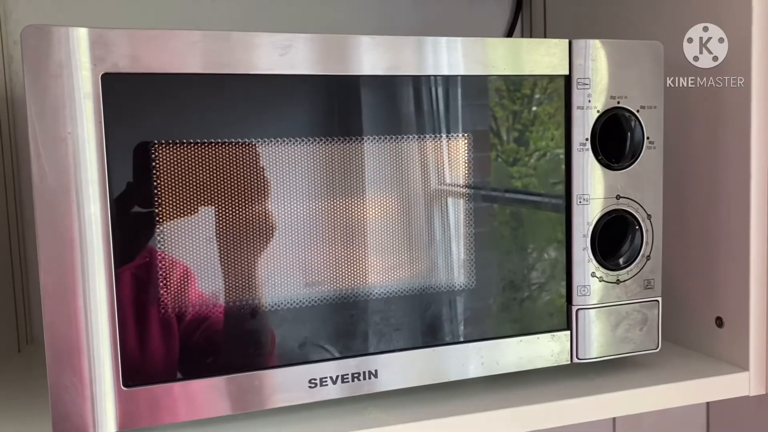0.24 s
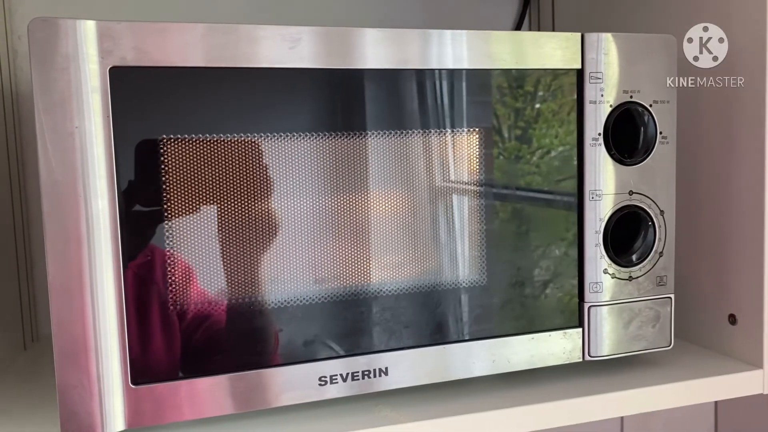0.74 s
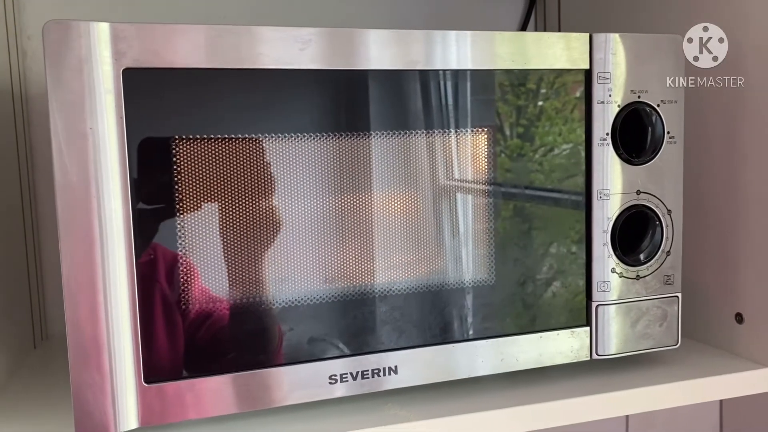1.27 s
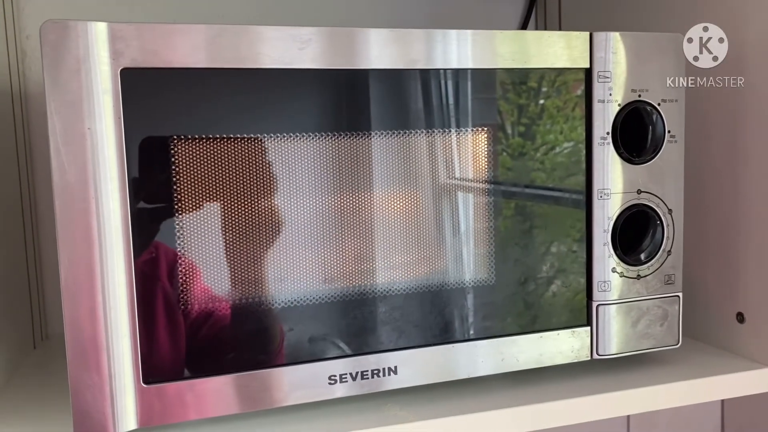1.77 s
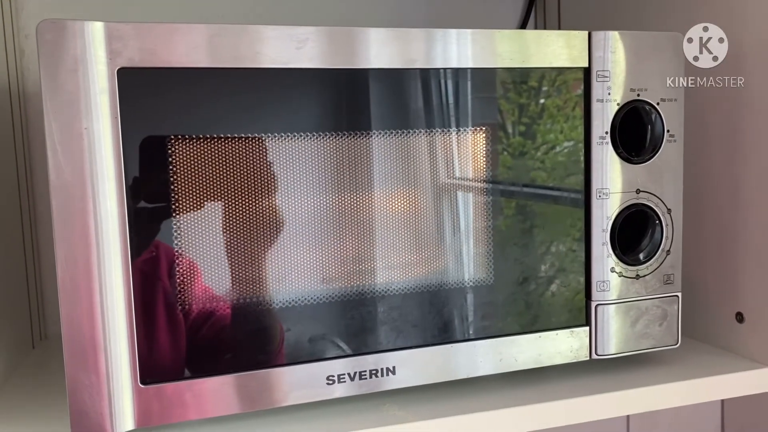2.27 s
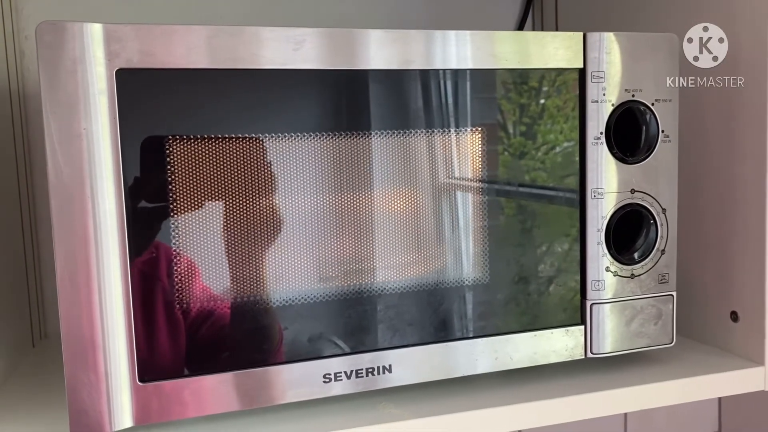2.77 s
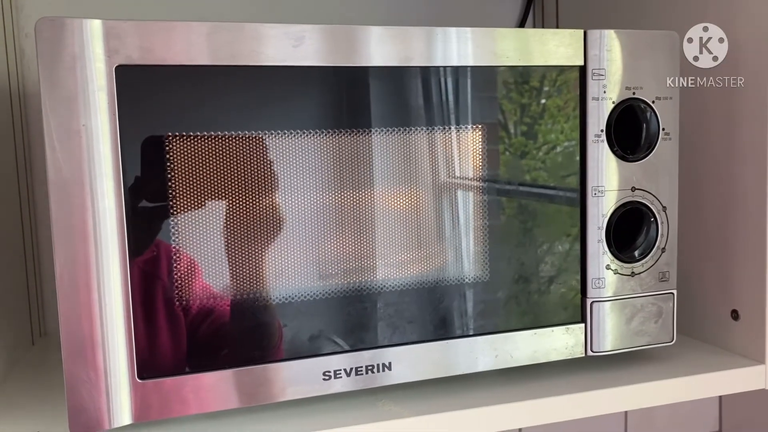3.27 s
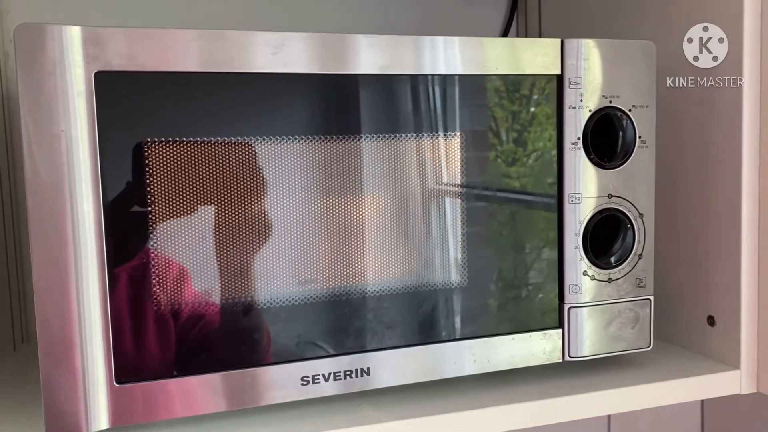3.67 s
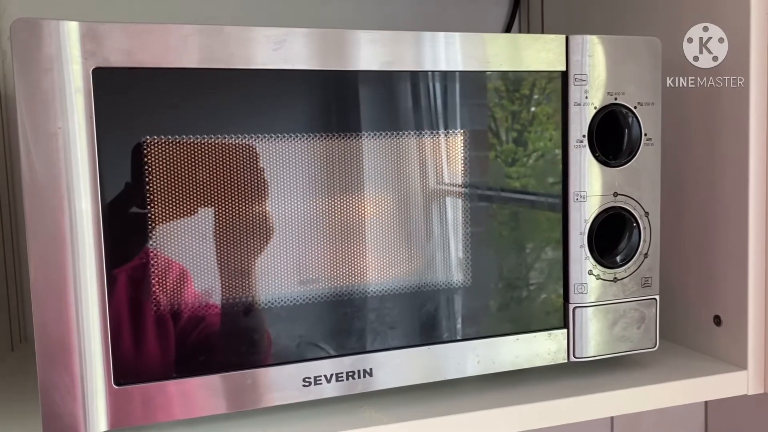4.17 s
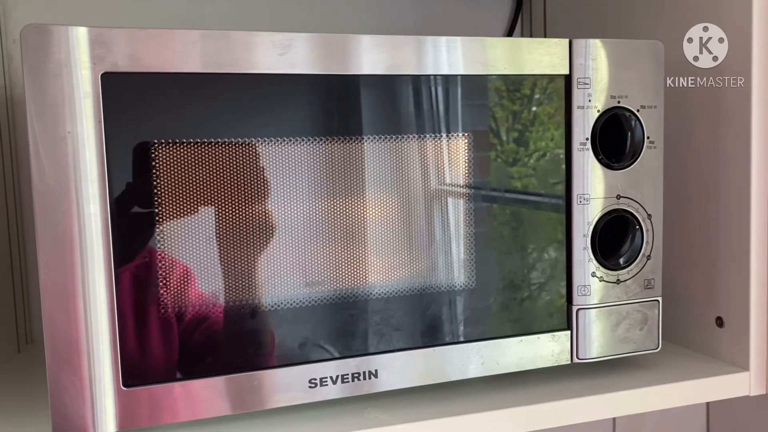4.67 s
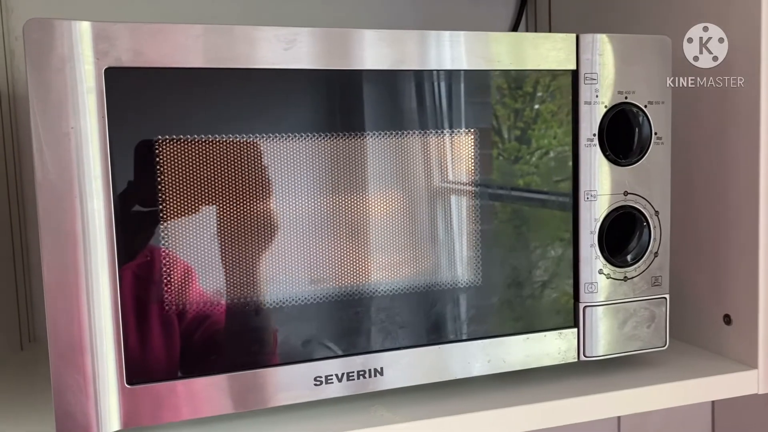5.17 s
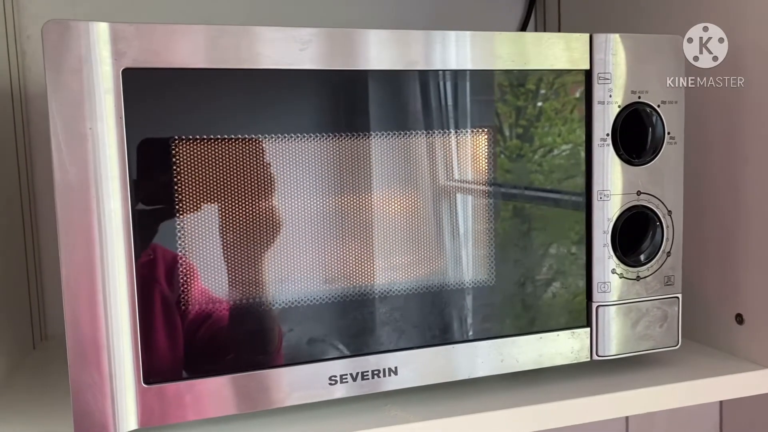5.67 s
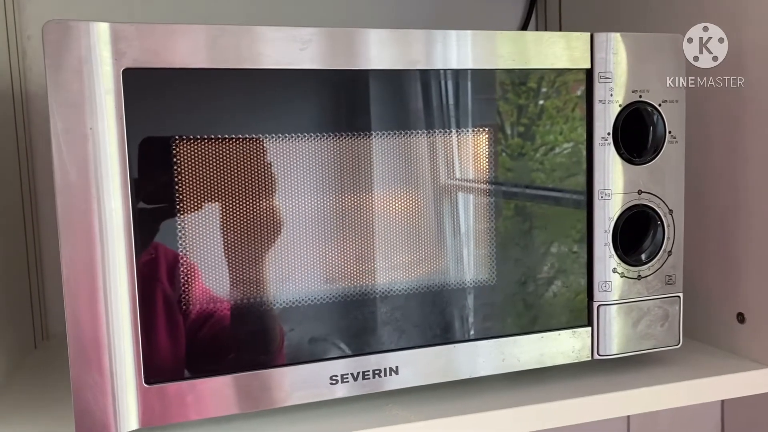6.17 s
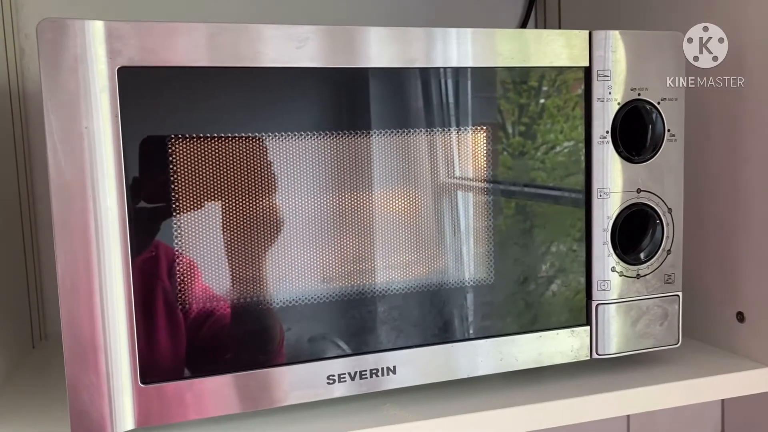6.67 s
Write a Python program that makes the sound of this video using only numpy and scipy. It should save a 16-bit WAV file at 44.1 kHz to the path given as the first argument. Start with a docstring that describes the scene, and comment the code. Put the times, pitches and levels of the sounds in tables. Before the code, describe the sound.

Continuous whirring of a countertop microwave, close microphone, indoors. The deep hum of its fan blades and a gentle electrical buzz blend with muffled, mid-low blowing air coloured by the metal case. Near three and a half seconds the sound drops out for less than a tenth of a second and returns smoothly, with a soft low thud-like rumble, then continues unchanged to the end, with barely audible small ticks.

```python
"""A microwave oven on a kitchen shelf, close to a two-port microphone, enters partway through a loop of a few seconds.
Fan sines on multiples of the shaft speed, noise coloured by the resonant case and sines of mains buzz run along.
After some three seconds the loop fades out, pauses for a moment and fades in again. Low rumble (mains hum and noise)
swells now and then; short shaky sines blip in the whirr, a noise burst ticks and a short sine peeps."""
import sys
import numpy as np
from scipy import signal
from scipy.io import wavfile
from scipy.ndimage import uniform_filter1d

SR = 44100
rng = np.random.default_rng(int(sys.argv[2]) if len(sys.argv) > 2 else 0)


def digitize_waveform(pressure):
    """Quantize a signal to 16-bit integers and store it at the path in sys.argv[1].

    Rows of a 2-D input are taken as channels; values are limited to [-1, 1].
    """
    field = np.atleast_2d(pressure).T
    bounded = np.clip(field, -1, 1)
    quanta = np.round(bounded * 32767).astype(np.int16)
    wavfile.write(sys.argv[1], SR, quanta)


N = 305172

SHAFT_HZ, BUZZ_HZ = 41.86, 100.05  # fan shaft speed; buzz at twice the mains rate
LOOP_S, RESTART_S = 4.57433, 3.404  # loop length; time heard when it begins again
SILENT_S, CUT_S = .0705, .0015  # pause at the end of the loop; quick soft step on either side of it
FADE_IN_S, FADE_OUT_S = 0.14, .105  # straight ramps of amplitude
FADE_IN_DB, FADE_OUT_DB = -27, -15.5  # gain where each ramp meets the pause
EDGE_HZ = 15800  # upper band limit
SIDE = np.array([[.5], [-.5]])  # left port, right port: shares out a left-right difference


def gain_of(db):
    """Amplitude factor of a level in dB."""
    return 10 ** (np.asarray(db) / 20)


def evened(x):
    """The same signal brought to rms 1."""
    return x / np.sqrt(np.mean(x ** 2) + 1e-20)


def read(points, hz):
    """Reads a curve between its points, along a logarithmic frequency axis."""
    f, value = np.transpose(points)
    return np.interp(np.log(hz + 1), np.log(f + 1), value)


def wander(t, top_hz):
    """Slow chance of rms 1: sines of random phase, the slower ones stronger."""
    total = 0
    for f in np.geomspace(top_hz / 20, top_hz, num=20):
        total = total + np.sin(2 * np.pi * (f * t + rng.random())) / np.sqrt(f)
    return evened(total)


def tone(turns, db, pan_db, lead=0, waver_db=1.0, waver_hz=12):
    """One sine of wavering level at both ports, with a trough at whole turns when neither port leads."""
    coarse_t = np.arange(0, N, 64) / SR
    level_db = np.interp(np.arange(N) / SR, coarse_t, db + waver_db * wander(coarse_t, waver_hz))
    level = gain_of(level_db + SIDE * pan_db)
    return -np.sqrt(2) * level * np.cos(2 * np.pi * turns + SIDE * lead)


def add(mix, s, sound):
    """Places a sound heard at time s at its spot in the loop."""
    start = round((s - RESTART_S) % LOOP_S * SR)
    mix[:, start:][:, :sound.shape[1]] += sound


def tick(out):
    """A faint burst of bright noise, alike at both ports, that dies fast at first, with a weaker, slower tail."""
    rise_s, t60_s, tail_t60_s, tail_db = .003, 0.04, .18, -8
    ring_hz, ring_width_hz = 11000, 2600
    t = np.arange(4000) / SR
    ring_band = [ring_hz - ring_width_hz / 2, ring_hz + ring_width_hz / 2]
    ring = signal.butter(2, ring_band, "bandpass", fs=SR, output="sos")
    broad = signal.butter(2, [5500, 14000], "bandpass", fs=SR, output="sos")
    noise = rng.standard_normal(len(t)) * np.ones((2, 1))
    burst = evened(signal.sosfilt(ring, noise))
    burst = burst + gain_of(-1) * evened(signal.sosfilt(broad, noise))
    dying = gain_of(-60 * t / t60_s) + gain_of(tail_db - 60 * t / tail_t60_s)
    add(out, 4.7475, burst * np.minimum(t / rise_s, 1) * gain_of(-66.5) * dying)


def peep_and_blips(out):
    """Short sines under a half-sine arch of level: a faint high peep, and blips of shaky phase in the whirr."""
    # brief tonal blips, once a loop: (time heard [s], level [dB rms], frequency [Hz])
    blips = [(3.586, -59, 1750), (5.337, -58, 1447), (5.984, -55, 1380), (6.538, -54.5, 1363),
             (6.7, -56.5, 1765), (6.78, -56, 1430)]
    arch_s, blip_pan_db, shake_turns = 0.037, 10, .4
    t = np.arange(4000) / SR
    arch = 2 * np.sin(np.pi * np.clip(t / arch_s, 0, 1)) * np.ones((2, 1))
    add(out, 6.122, gain_of(-73) * arch * np.sin(2 * np.pi * 7740 * t))  # the peep
    slow = signal.butter(2, 60, fs=SR, output="sos")
    for s, db, hz in blips:
        shake = shake_turns * evened(signal.sosfilt(slow, rng.standard_normal(len(t))))
        sides = gain_of(db + SIDE * blip_pan_db)
        add(out, s, sides * arch * np.sin(2 * np.pi * (hz * t + shake)))


def small_sounds():
    """The faint short sounds, laid into the loop."""
    out = np.zeros((2, N))
    tick(out)
    peep_and_blips(out)
    return out


def rumble():
    """Hum and noise near the mains rate, alike at both ports, that swells quickly and sinks slowly."""
    # swells of the rumble, once a loop: (start as heard [s], top level of the noise part [dB rms])
    swells = [(3.47, -55.5), (3.72, -63), (3.92, -61), (4.25, -67), (5, -65.5), (2.68, -69)]
    floor_db, rise_s, fall_db_per_s = -78, 0.052, 40
    hum_db = 5  # pure mains hum against the noise
    t = np.arange(N) / SR
    level = gain_of(floor_db)
    for s, db in swells:
        since = t - (s - RESTART_S) % LOOP_S
        sinking = gain_of(db - fall_db_per_s * (since - rise_s))
        level = level + np.clip(since / rise_s, 0, 1) * sinking
    band = signal.butter(4, [42, 68], "bandpass", fs=SR, output="sos")
    noise = evened(signal.sosfilt(band, rng.standard_normal(N)))
    hum = tone(BUZZ_HZ / 2 * t, hum_db, 0, waver_db=2.0, waver_hz=6.5)
    return (noise + hum) * level


def transformer():
    """Steady mains tones, one mixed with the blade rate, that swell unevenly together."""
    # mains buzz, and the tone at buzz rate plus blade rate, before the swell:
    # (multiple of the buzz [1], multiple of the shaft [1], level [dB rms], left-right [dB])
    buzz = [(1, 0, -56, -2), (2, 0, -65, 6.5), (1, 4, -56.5, -2.5), (3, 0, -61, 2), (4, 0, -65.5, 8),
            (6, 0, -63, 2)]
    # swell of the whole buzz: (time into the loop [s], level [dB])
    buzz_swell = [(0, 0), (.6, 1.5), (1.2, -1.5), (1.6, 0), (2.1, 2), (2.6, -1), (3.1, -4.5), (3.5, 2),
                  (4, -1.5), (4.5, -1)]
    t = np.arange(N) / SR
    total = 0
    for m, k, db, pan in buzz:
        hz = round(m) * BUZZ_HZ + round(k) * SHAFT_HZ
        total = total + tone(hz * t + rng.random(), db, pan, waver_db=1.5, waver_hz=5)
    return gain_of(np.interp(t, *np.transpose(buzz_swell))) * total


def airflow():
    """Turbulent air blown by the fan: noise coloured by the resonant case, in drifting patches."""
    # spectrum of the air before the case, only its shape counts: (frequency [Hz], level [dB per Hz])
    air_colour = [(22, -30), (33, -24), (45, -20), (62, -12), (80, -9), (150, -7.5), (300, -6.5), (500, -5),
                  (800, -8.5), (1300, -12), (1900, -19.5), (3000, -24), (4500, -31), (6800, -38.5),
                  (8600, -45), (11500, -51), (15000, -64), (15800, -80)]
    # case and shelf resonances that lift or notch the air noise:
    # (frequency [Hz], width [Hz], lift [dB], left-right [dB])
    resonances = [(75, 14, 1.5, 1), (87, 8, -5.5, -1), (99, 6.4, 5.5, 1), (129.4, 34, 5.5, 1.5),
                  (183, 21, -5.5, 1), (211.8, 14.7, 8, -1), (228.3, 20, 9, 3), (247, 16, -7, -2),
                  (281, 16, -4, 7), (322.4, 15, -7, 3), (340.2, 22, 8, 2), (367, 26, -9.5, 1),
                  (435, 20, 5, 3), (455, 17, -7, 7), (468, 12, -6.5, 0), (514, 11, -2.5, 1),
                  (525, 31, 4.5, -1.5), (541, 10, -3.5, 0), (559, 29, 4.5, 2.5), (609, 55, 5.5, 5.5),
                  (707, 35, -2, -1), (752, 16, 3, 1), (794, 27, -3, -3), (795, 14, -1, -1),
                  (823, 27, -8, 9), (864.8, 61, 10.5, 1), (917, 35, 2.5, 4), (966, 12, -2, 1),
                  (1015, 26, 8, -4.5), (1047, 14, -5.5, 1), (1053, 38, -5.5, 7), (1152, 87, 3, -2),
                  (1198, 20, 4.5, 1), (1219, 25, -10, -3), (1310, 19, -3.5, 2), (1337, 25, 1, 4),
                  (1394, 18, 4, -7), (1380, 14, -3, 0), (1560, 18, -5.5, -1), (1612, 57, 5, 2),
                  (1692.5, 27, 9.5, 5), (1744, 28, 6, 3), (1800, 25, -5.5, -6), (1823, 30, 3, 12.5),
                  (1870, 25, -0.5, -1), (2030, 55, 3, 6.5), (2140, 17, 1, 0), (2230, 57, 5, 5.5),
                  (2300, 35, -3.5, 1), (2378, 78, 6.5, 3.5), (2436, 33, 3, -2), (2470, 35, -1.5, -1),
                  (2510, 80, 2, 6.5), (2644, 47, 3.5, 3), (3030, 60, 2.5, 3), (3160, 50, -3, 0),
                  (3240, 45, 4.5, 2), (3340, 50, -11.5, 1), (3440, 45, 4.5, -1), (3570, 50, -4, 0),
                  (3630, 79, 3, 2), (3830, 220, 1, 1), (6660, 310, 3, -3)]
    # likeness of the two ports: (frequency [Hz], left-right correlation [1])
    likeness = [(25, .9), (45, .97), (60, 0.97), (120, 1), (400, 0.95), (640, 0.83), (760, 0.5),
                (900, 0.79), (1100, 0.56), (1350, 0.33), (1700, 0.4), (1950, 0.17), (2400, 0.57),
                (3700, 0.71), (5300, 0.29), (6600, 0.85), (9000, 1), (14500, 0.97)]
    # balance of the ports: (frequency [Hz], left-right [dB])
    balance = [(60, 1), (180, 1), (540, -1.5), (1620, -1.5), (4850, 2.5), (14500, -1.5)]
    # phase between the ports: (frequency [Hz], lead of the left [rad])
    left_lead = [(60, 0), (850, -.1), (1030, -1.4), (1300, 0), (3100, .4), (4200, -.1), (5300, .8),
                 (7300, 0), (9000, -3.1), (11000, -6.3), (13200, -9.4), (14700, -12.6)]
    air_db, patch_db = -41, 0.98  # level of the whole; rms depth of the patches
    frames, hz = N // 1024 + 5, np.fft.rfftfreq(4096, 1 / SR)
    a, b, c, d, patches = rng.standard_normal((frames, 2049, 5)).T
    patches = uniform_filter1d(patches, size=30, axis=0)  # along frequency
    patches = evened(uniform_filter1d(patches, size=3, axis=1))  # along time

    same = np.clip(read(likeness, hz), -1, 1)[:, None]
    left = a + 1j * b
    right = same * left + np.sqrt(1 - same ** 2) * (c + 1j * d)

    case_db = 0
    for f, width, db, pan in resonances:
        case_db = case_db + (db + SIDE * pan) / (1 + (2 * (hz - f) / width) ** 2)
    colour = gain_of(read(air_colour, hz) + SIDE * read(balance, hz) + case_db)
    colour = colour * np.exp(1j * SIDE * read(left_lead, hz))

    # reflections from shelf and walls leave a fixed fine ripple, partly different at each port
    ripple = uniform_filter1d(rng.standard_normal((3, 2049)), size=2)
    depth_db = 1.8 * np.clip((hz - 900) / 3000, 0, 1)
    colour *= gain_of(depth_db * evened(ripple[0] + ripple[1:]))

    spectrum = np.array([left, right]) * colour[..., None] * gain_of(patch_db * patches)
    air = signal.istft(spectrum, nperseg=4096, noverlap=3072)[1][:, :N]
    return gain_of(air_db) * evened(air)


def fan():
    """Multiples of a slightly drifting shaft speed, troughs lined up as in suction pulses; higher ones waver more."""
    # tones of the four-bladed fan:
    # (multiple of the shaft, rounded for pitch [1], level [dB rms], left-right [dB], lead of the left [rad])
    fan_tones = [(2.998, -68, 8, -0.3), (3.997, -39, 3, -0.32), (4.96, -61.5, 6, 0.16),
                 (8, -43.5, 1.5, -0.21), (12, -56.5, 1.5, -1.34), (15.98, -59.5, 5.5, -0.38),
                 (20, -78, 4, -0.79), (27.9, -58.5, 1, -1.07), (32.2, -76, -3, -0.25), (36, -72, 11, 0.4)]
    t = np.arange(N) / SR
    drift = np.interp(t, t[::64], wander(t[::64], 3.5))
    turns = SHAFT_HZ * t + 0.0027 * drift
    total = 0
    for k, db, pan, lead in fan_tones:
        total = total + tone(round(k) * turns, db, pan, lead, waver_db=0.22 + 0.048 * k, waver_hz=25.31)
    return total


def scene():
    """The oven, counted from the start of the loop."""
    return small_sounds() + rumble() + transformer() + airflow() + fan()


def record(dry):
    """Fades the loop in and out, plays it round and round, then limits the band."""
    t, end = np.arange(N) / SR, LOOP_S - SILENT_S
    ramp_times = [0, FADE_IN_S, end - FADE_OUT_S, end]
    fade = np.interp(t, ramp_times, [gain_of(FADE_IN_DB), 1, 1, gain_of(FADE_OUT_DB)], right=0)
    fade = fade * np.clip(np.minimum(t, end - t) / CUT_S, 0, 1)
    place_in_loop = (np.arange(N) - round(RESTART_S * SR)) % round(LOOP_S * SR)
    looped = (dry * fade)[:, place_in_loop]
    lowpass = signal.firwin(511, EDGE_HZ, window=("kaiser", 9), fs=SR)
    return signal.oaconvolve(looped, lowpass[None], "same")


dry = scene()
out = record(dry)
digitize_waveform(out)
```